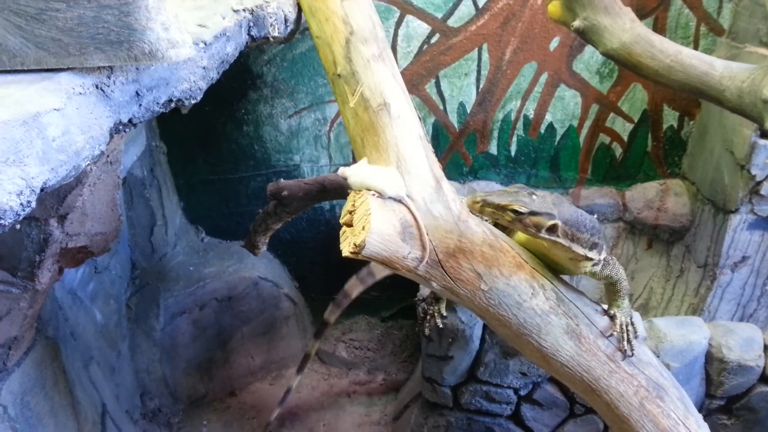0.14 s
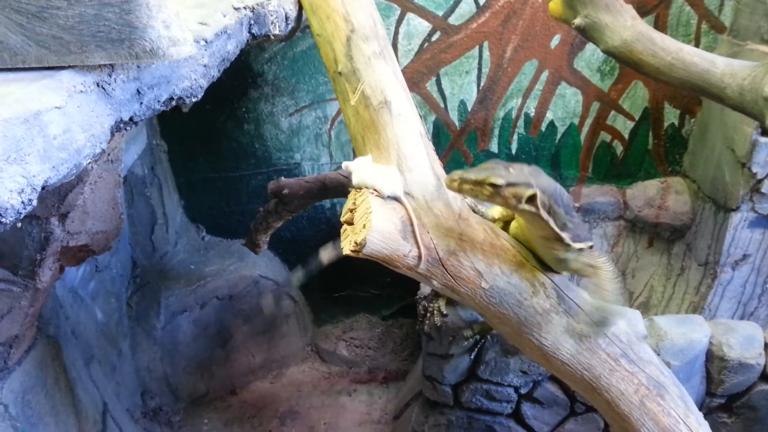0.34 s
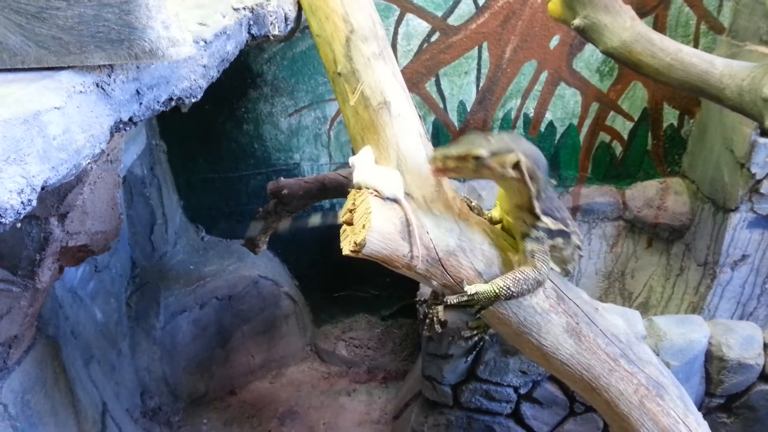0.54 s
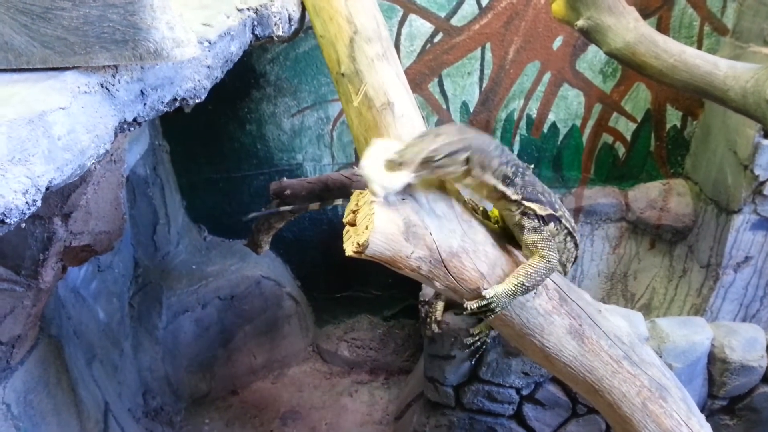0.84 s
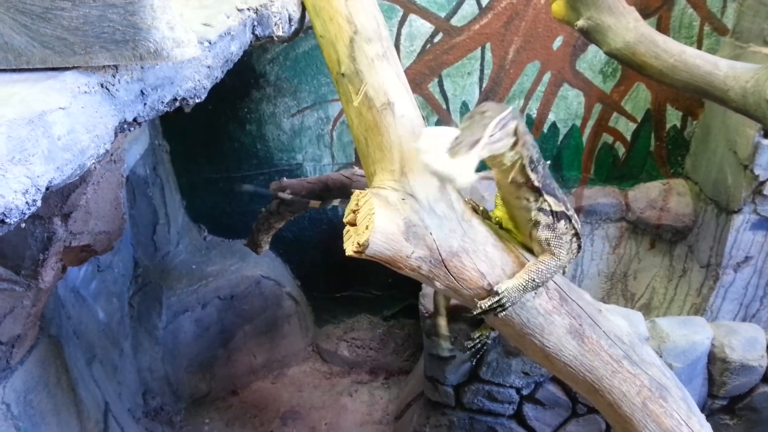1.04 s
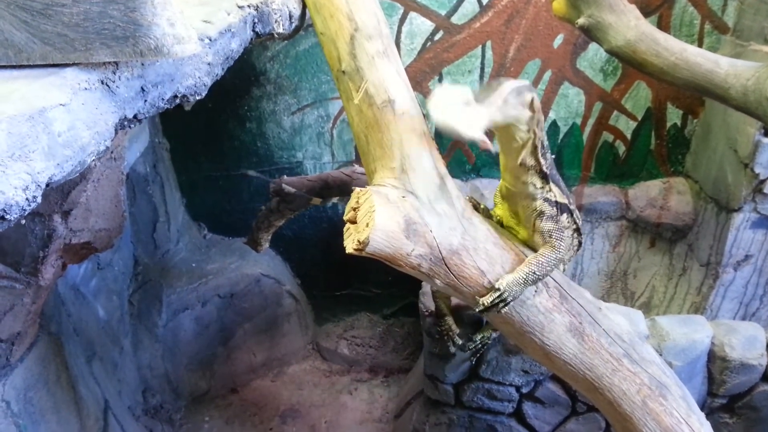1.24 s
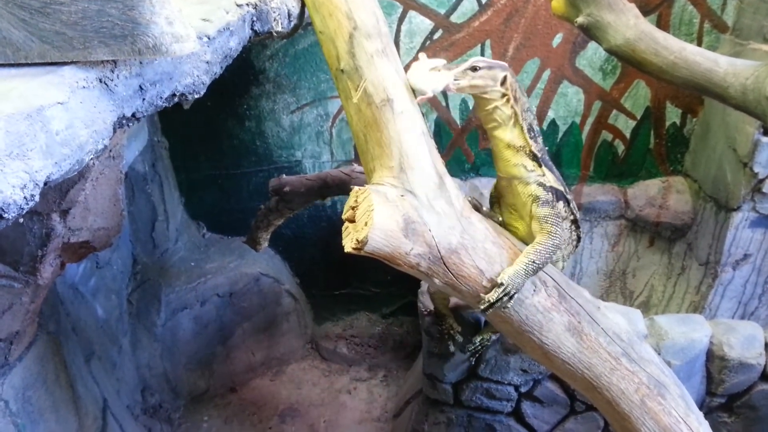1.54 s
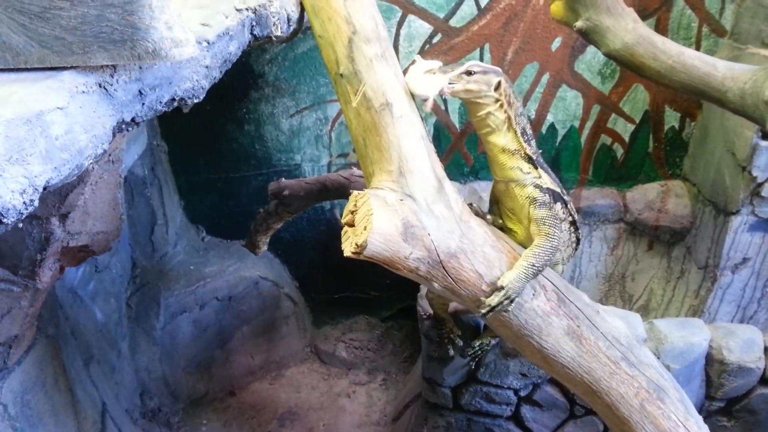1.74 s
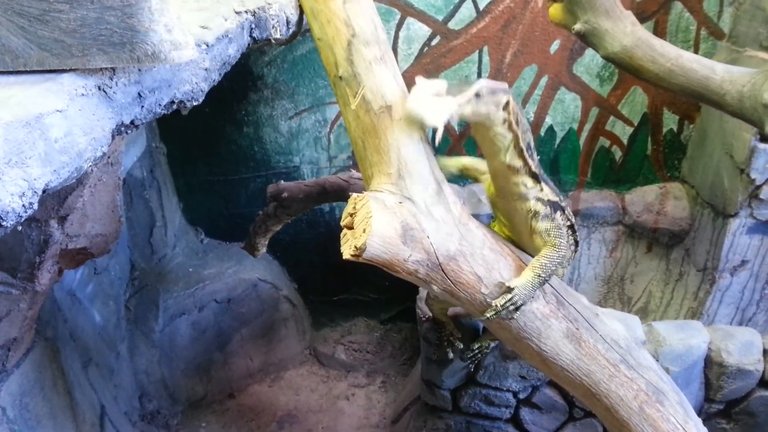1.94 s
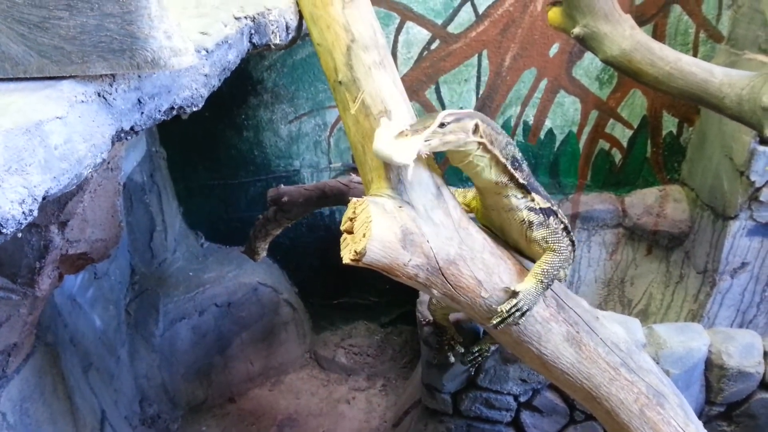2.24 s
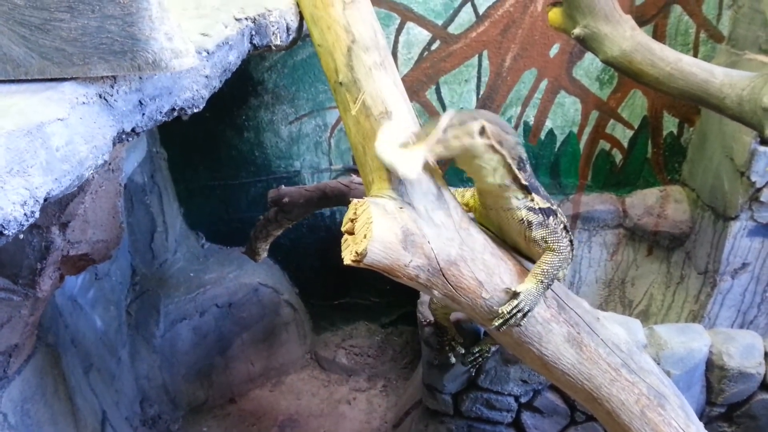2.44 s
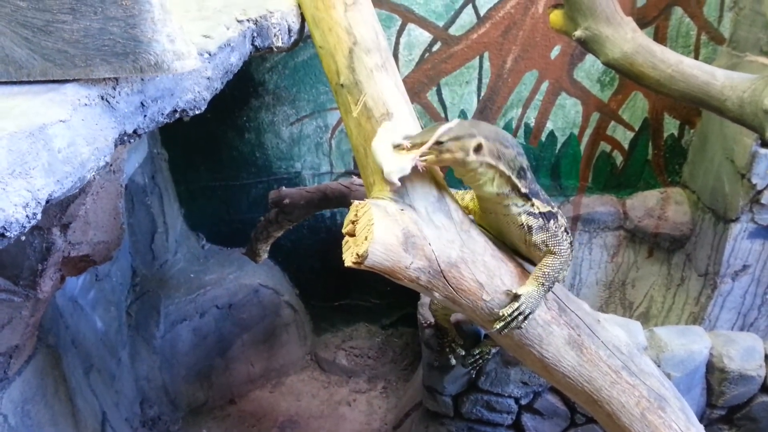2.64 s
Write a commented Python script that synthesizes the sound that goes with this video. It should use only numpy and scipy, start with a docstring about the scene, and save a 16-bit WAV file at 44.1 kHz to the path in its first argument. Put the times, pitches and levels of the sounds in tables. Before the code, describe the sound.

A mouse squeals five times in a lizard's jaws: a brief chirp at 0.9 s, longer squeaks at 1.1 and 1.5 s, a raspy, hissing one at 1.95 s ending in a shriek, and a harsh sharp one at 2.4 s. Before them, from 0.25 to 0.9 s, claws faintly scuff and tick on wood. A low fan rushes and hums throughout; hard walls add short echoes.

```python
"""Mouse caught by a lizard

A mouse squeals five times in the jaws of a monitor lizard, in a hard-walled enclosure where a fan hums.
Each squeak is a stack of sine tones on a moving pitch, with half-pitch lines and rasping, hissing noise.
The lizard's claws scuff and tick on a branch before that: short bursts of filtered noise.
The fan is a steady rush of shaped noise with a few wavering tones."""
import sys
import numpy as np
from scipy import signal
from scipy.fft import rfft, irfft
from scipy.io import wavfile

SR = 44100
rng = np.random.default_rng(int(sys.argv[2]) if len(sys.argv) > 2 else 0)


def wav_out(sig):
    """Save sig, one row per channel (or a flat mono array), as 16-bit PCM at SR to the path in sys.argv[1]."""
    wavfile.write(sys.argv[1], SR, np.round(np.clip(np.atleast_2d(sig).T, -1, 1) * 32767).astype(np.int16))


N = 123479  # length of the scene in samples


def amp(db):
    """Turns decibels into a gain."""
    return 10 ** (np.asarray(db) / 20)


def unit(x):
    """Scales to an rms (average strength) of 1."""
    return x / np.sqrt(np.mean(x ** 2) + 1e-20)


def read(points, hz):
    """Reads a table between its points, on a log-frequency axis."""
    f, value = np.transpose(points)
    return np.interp(np.log(hz + 1), np.log(f + 1), value)


def add(mix, start_s, sound):
    """Mixes a sound in at a start time in seconds."""
    part = mix[max(round(start_s * SR), 0):][:len(sound)]
    part += sound[:len(part)]


def bell(f, hz, octaves):
    """A smooth hump of gain around hz, as wide as octaves says."""
    return np.exp(-.5 * (np.log2((f + 1) / hz) / octaves) ** 2)


def noise(size, shape):
    """Noise whose spectrum follows the gain shape(Hz), scaled to rms 1 before it is cut to size."""
    spectrum = rfft(rng.standard_normal(N)) * shape(np.fft.rfftfreq(N, 1 / SR))
    return unit(irfft(spectrum, N))[:size]


def wander(size, hz):
    """Random drift, mostly slower than hz."""
    return noise(size, lambda f: 1 / (1 + (f / hz) ** 4))


def lift(stretches, t):
    """The dB that a set of stretches adds at times t, with soft edges."""
    edge_s = .008  # time the voice takes to change register
    total = 0
    for start, end, db in stretches:
        inside = np.minimum(t - start, end - t)
        total = total + db * np.clip(inside / edge_s + .5, 0, 1)
    return total


def voice_tones(t, pitch, tone, rasp, hiss, rough):
    """The voiced part: sines at multiples of a jittering pitch, and half-pitch lines from period doubling."""
    # How the lowest throat resonance passes the fundamental. Each row: pitch in Hz, gain in dB.
    low_throat = [(3450, -11.5), (3620, -2), (4200, 0.5), (4600, 5)]
    # Throat resonance, here acting on the half-pitch line. Each row: frequency in Hz, gain in dB.
    throat_gain = [(2000, -38), (4800, -24.5), (5800, -9.5), (6500, -4.5), (7000, 2.5), (7700, -5),
                   (8700, -13), (9800, -87), (15000, -37)]
    # Where the half-pitch lines stand out. Each row: start in seconds, end in seconds, lift in dB.
    splits = [(1.5, 1.635, 5.5), (1.657, 1.714, 11.5), (2.474, 2.506, 13)]
    # Where the third harmonic shrieks. Each row: start in seconds, end in seconds, lift in dB.
    shrieks = [(2.09, 2.135, 14), (2.42, 2.484, 17.5)]
    clear_jitter, rough_jitter, jitter_hz = .0025, .0133, 400  # pitch jitter as a share of pitch; its speed
    shimmer_db, shimmer_hz = 3, 145  # level flutter of each line and its speed
    blur, blur_hz = .61, 437  # phase scatter in radians and its speed
    n = len(t)

    jitter = (clear_jitter + rough_jitter * rough) * wander(n, jitter_hz)
    phase = 2 * np.pi * np.cumsum(pitch * (1 + jitter)) / SR

    masking = -6 * rough  # dB: the lowest two lines sink as the voice breaks into rasp
    split = lift(splits, t)
    first = -36 + read(low_throat, pitch) + masking
    half = rasp + 5.5 + split + masking + read(throat_gain, pitch * 1.5)
    third = -41 + .5 * (tone + 28) + lift(shrieks, t)  # follows the tone level at half strength
    upper_half = hiss - 5 + .5 * split
    # Each pair: multiple of the pitch, level in dB
    partials = [(1, first), (2, tone + 8.5), (3, third), (1.5, half), (2.5, upper_half)]

    voice = np.zeros(n)
    for multiple, db in partials:
        level = amp(db + shimmer_db * wander(n, shimmer_hz))
        scatter = blur * (rough + (multiple > 2)) * wander(n, blur_hz)  # always present in the top lines
        voice += level * np.sqrt(2) * np.sin(multiple * phase + scatter)
    return voice


def turbulence(t, pitch, rasp, hiss):
    """The airy part: rattling throat noise and hiss, partly repeated so that it gathers in stacked bands."""
    # Turbulence in the throat resonance. Each row: frequency in Hz, gain in dB before scaling to rms 1.
    throat_gain = [(2000, -38), (4800, -24.5), (5800, -9.5), (6500, -4.5), (7000, 2.5), (7700, -5),
                   (8700, -13), (9800, -87), (15000, -37)]
    # Broad hiss of a forced squeal. Each row: frequency in Hz, gain in dB before scaling to rms 1.
    hiss_gain = [(4600, -22), (5600, -4), (9000, 12.5), (11000, 5.5), (14300, 0.5), (15500, -14)]
    rattle_db, rattle_hz = 3, 300  # level flutter of the rasp and its speed
    lock, lock_cycles = .6, 4  # strength of the repeat, and its delay in cycles of the pitch
    n = len(t)
    rasp_level = amp(rasp + 4.5 + rattle_db * wander(n, rattle_hz))
    throat = rasp_level * noise(n, lambda f: amp(read(throat_gain, f)))
    air = throat + amp(hiss + 6.5) * noise(n, lambda f: amp(read(hiss_gain, f)))
    repeat = np.interp(t - lock_cycles / pitch, t, air)
    return (air + lock * repeat) / np.hypot(1, lock)


def squeak(rows):
    """One squeal: voiced tones, strongest around the second harmonic, plus turbulent air, faded in and out."""
    attack_s, release_s = .003, .0093
    times, *controls = np.transpose(rows)
    t = np.arange(times[0] - attack_s, times[-1] + release_s, 1 / SR)
    pitch, tone, rasp, hiss = (np.interp(t, times, c) for c in controls)
    rough = 1 / (1 + amp(tone - rasp) ** 2)  # 0 = clear tone, 1 = full rasp
    sound = voice_tones(t, pitch, tone, rasp, hiss, rough) + turbulence(t, pitch, rasp, hiss)
    fade_in = np.clip((t - t[0]) / attack_s, 0, 1)
    fade_out = np.clip((t[-1] - t) / release_s, 0, 1)
    return t[0], fade_in * fade_out * sound


def mouse():
    """The mouse's five squeaks, each with its own path of pitch and loudness."""
    # One list per squeak. Each row: time in seconds, pitch in Hz, then the tone, rasp and hiss
    # controls in dB, to which the voice adds its own offsets.
    squeaks = [
        [(0.901, 3300, -32, -35, -49), (0.91, 4250, -34, -46, -47), (0.92, 4190, -31.5, -56, -54),
         (0.938, 4090, -45, -56, -59), (0.944, 4390, -19.5, -50, -56), (0.96, 4620, -26, -44, -55),
         (0.976, 3900, -35, -38, -38)],
        [(1.111, 3770, -26, -31, -30), (1.116, 4070, -23, -33, -44), (1.128, 4440, -18, -41, -51),
         (1.14, 4580, -25.5, -42, -46), (1.165, 4526, -27.5, -36, -62), (1.2, 4245, -24.5, -37, -55),
         (1.24, 4310, -29, -29, -41), (1.275, 4250, -23, -37, -40), (1.307, 3790, -28.5, -29, -30)],
        [(1.468, 3376, -29, -28, -40), (1.477, 3880, -20.5, -34, -42), (1.497, 4556, -29, -35, -46),
         (1.53, 4520, -29.5, -36.5, -50), (1.61, 4606, -35.5, -39, -48), (1.63, 4510, -33, -32, -42),
         (1.655, 3930, -31, -32.5, -42), (1.68, 3926, -28.5, -32, -46), (1.706, 3873, -40, -31, -35.5),
         (1.742, 3870, -49, -37, -33)],
        [(1.954, 3384, -34, -25, -46), (1.975, 3480, -30, -26, -42.5), (2.04, 3474, -40, -26, -42),
         (2.085, 3626, -33, -32, -26), (2.142, 3680, -31, -29.5, -28.5), (2.147, 3744, -16, -29, -36),
         (2.158, 4014, -18, -40, -37), (2.171, 3605, -28.5, -22, -32)],
        [(2.402, 3300, -40.5, -42.5, -30.5), (2.412, 3980, -28.5, -29, -19.5), (2.425, 4182, -33.5, -40, -33),
         (2.475, 4217, -25.5, -41, -32), (2.487, 4354, -24.5, -39, -40), (2.505, 4230, -21, -42, -44),
         (2.513, 3756, -17.5, -36, -52), (2.53, 4095, -31, -33.5, -47), (2.55, 4203, -23, -23, -49),
         (2.56, 4100, -36.5, -37, -50), (2.568, 3470, -23, -20.5, -44)],
    ]
    out = np.zeros(N)
    for rows in squeaks:
        add(out, *squeak(rows))
    return out


def claw_ticks():
    """Claws tapping the branch: noise that dies away quickly, filtered around one frequency."""
    # Each row: start in seconds, gain in dB, centre in Hz, decay time in seconds
    # (the time to fall to about a third, before filtering).
    ticks = [(0.504, -23.5, 5200, 0.0046), (0.5924, -20, 8100, .0009), (0.599, -31.5, 8500, 0.00063),
             (0.7715, -25.5, 6430, 0.0027)]
    octaves = .51  # width of the filter
    out, t, f = np.zeros(N), np.arange(N) / SR, np.fft.rfftfreq(N, 1 / SR)
    for start_s, db, hz, decay_s in ticks:
        snap = rfft(np.exp(-t / decay_s) * rng.standard_normal(N))
        tick = irfft(snap * unit(bell(f, hz, octaves)), N)
        out += amp(db) * np.roll(tick, round(start_s * SR))
    return out


def claw_scuffs():
    """Claws scraping the bark: noise bands that swell and fade with a grainy, flickering level."""
    # Each row: middle in seconds, half length in seconds, level in dB around which the grain flickers,
    # centre in Hz, width in octaves.
    scuffs = [(0.26, 0.012, -30, 6180, 0.32), (0.265, 0.015, -40.5, 1510, 1),
              (0.617, 0.0065, -33, 7700, 0.38), (0.692, 0.021, -32, 6360, 0.42),
              (0.865, 0.013, -45, 10000, 0.17)]
    grain_db, grain_hz = 3, 300
    out, t = np.zeros(N), np.arange(N) / SR
    for middle_s, half_s, db, hz, octaves in scuffs:
        grain = amp(db + grain_db * wander(N, grain_hz))
        swell = np.exp(-.5 * ((t - middle_s) / half_s) ** 2)
        out += grain * swell * noise(N, lambda f: bell(f, hz, octaves))
    return out


def fan():
    """Steady rush of air, nearly the same left and right in the bass, with a few wavering tones."""
    # Colour of the rushing air. Each row: frequency in Hz, relative level in dB per Hz.
    air_colour = [(45, -33), (62, -8), (95, -12), (140, -4), (265, -6), (390, -2), (590, -4), (900, -10.5),
                  (2100, -13.5), (3000, -20.5), (4300, -23.5), (7000, -17), (8500, -26), (13000, -39),
                  (15000, -68)]
    # How alike left and right are. Each row: frequency in Hz, likeness (1 = the same, 0 = unrelated).
    likeness = [(30, 0.93), (120, 0.88), (350, 0.85), (700, 0.48), (1400, 0.017)]
    # Balance of the air. Each row: frequency in Hz, left minus right in dB.
    balance = [(130, 0), (290, 6), (640, 5.5), (1410, 3), (3100, 3.5), (6820, -6.5), (15000, -2.5)]
    # Fan tones. Each row: frequency in Hz, level in dB, left minus right in dB.
    hum = [(160.8, -47, 1), (220, -44, 1), (440, -48, 7), (490.4, -45, 1.5)]
    air_db, waver_hz, waver_depth = -33, 7.5, .56
    hz, t = np.fft.rfftfreq(N, 1 / SR), np.arange(N) / SR
    lean = np.array([[.5], [-.5]])  # half of a balance goes to each side

    a, b = rfft(rng.standard_normal((2, N)))
    same = np.clip(read(likeness, hz), -1, 1)
    pair = np.array([a, same * a + np.sqrt(1 - same ** 2) * b])
    pair = pair * amp(read(air_colour, hz) + lean * read(balance, hz))
    out = amp(air_db) * unit(irfft(pair, N))

    for tone_hz, db, pan_db in hum:
        # A complex drift makes both strength and phase waver
        drift = wander(N, waver_hz) + 1j * wander(N, waver_hz)
        tone = ((1 + waver_depth * drift) * np.exp(2j * np.pi * tone_hz * t)).real
        out += amp(db + lean * pan_db) * unit(tone)
    return out


def sparse(t, per_second):
    """Random yes/no marks for two channels, about per_second of them each second."""
    return rng.random((2, len(t))) < per_second / SR


def unit_energy(echoes):
    """Scales each channel of echoes to a total energy of 1."""
    return echoes / np.linalg.norm(echoes, axis=1, keepdims=True)


def early_reflections(t):
    """Nearby surfaces: random single echoes that soon die away."""
    signs = rng.choice([-1., 1.], (2, len(t)))
    return unit_energy(signs * sparse(t, 1500) * np.exp(-t / .009))


def hard_wall_tail(t):
    """Hard walls: a crowd of echoes after a short gap, each pitch range dying at its own rate."""
    # Each row: frequency in Hz, time to fall by 60 dB in seconds.
    fall_time = [(4000, 0.3), (8000, 0.2), (14000, 0.25)]
    gap_s = .004
    taps = rng.standard_normal((2, len(t))) * sparse(t, 4000) * (t > gap_s)
    f, age, z = signal.stft(taps, SR, nperseg=256)
    fading = amp(-60 * age / read(fall_time, f)[:, None])
    return unit_energy(signal.istft(z * fading, SR, nperseg=256)[1])


def enclosure(x):
    """Direct sound and near reflections, shaded and slightly ahead on the left, then a short wall tail."""
    # Tone of the near sound on the left. Each row: frequency in Hz, gain in dB.
    left_shade = [(2000, 12), (4400, -4), (5400, -36), (7000, -39.5), (8600, -14), (10500, -24),
                  (12500, -1.5), (15000, -1)]
    left_lead_s = .00009
    early_db, tail_db = -12, np.array([[-6], [-3]])  # tail: left, right
    t, hz = np.arange(SR // 2) / SR, np.fft.rfftfreq(N, 1 / SR)
    early = signal.fftconvolve(x[None], early_reflections(t), axes=1)[:, :N]
    near = x + amp(early_db) * early
    lead = np.exp(2j * np.pi * hz * left_lead_s)
    left = irfft(rfft(near[0]) * amp(read(left_shade, hz)) * lead, N)
    tail = signal.fftconvolve(x[None], hard_wall_tail(t), axes=1)[:, :N]
    return np.array([left, near[1]]) + amp(tail_db) * tail


def scene():
    """Mouse and claws echo in the enclosure, over the fan."""
    return enclosure(mouse() + claw_ticks() + claw_scuffs()) + fan()


def record(dry):
    """The recorder's band limit: a low-pass filter takes away the highest treble."""
    cutoff_hz = 14750
    low_pass = signal.firwin(161, cutoff_hz, window=("kaiser", 9), fs=SR)
    return signal.oaconvolve(dry, low_pass[None], "same")


dry = scene()
out = record(dry)
wav_out(out)
```